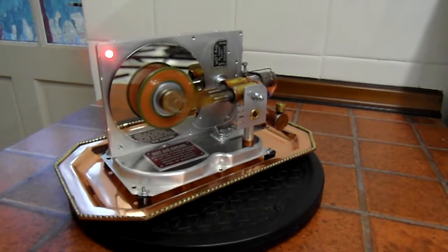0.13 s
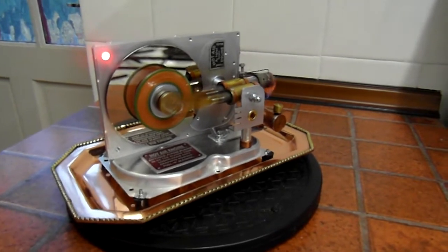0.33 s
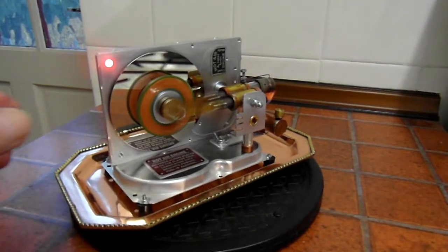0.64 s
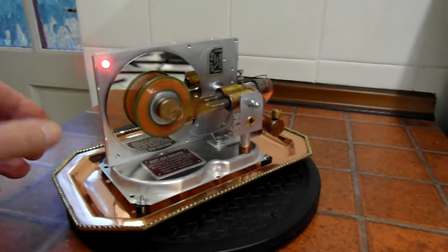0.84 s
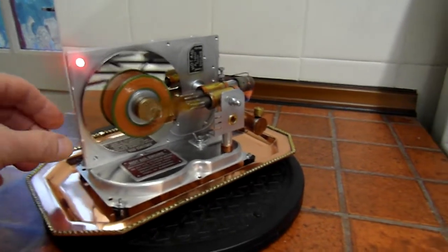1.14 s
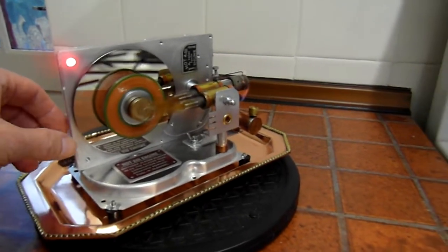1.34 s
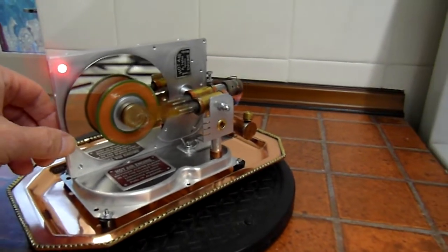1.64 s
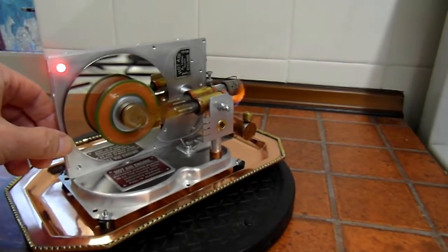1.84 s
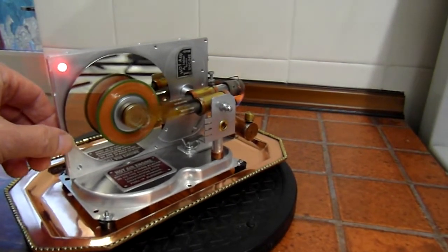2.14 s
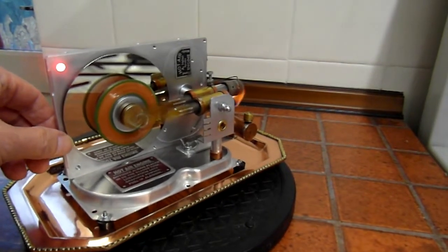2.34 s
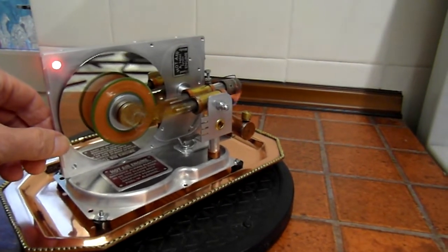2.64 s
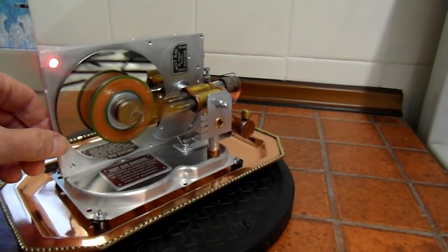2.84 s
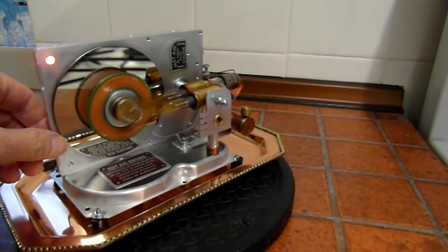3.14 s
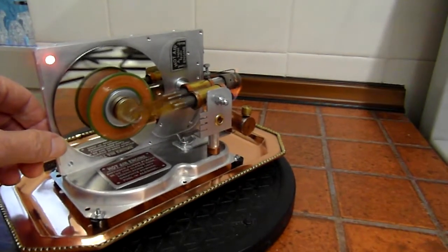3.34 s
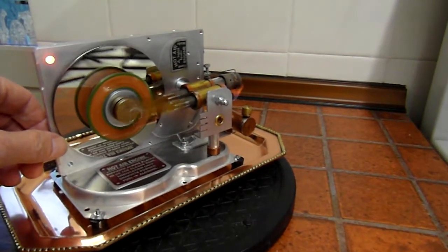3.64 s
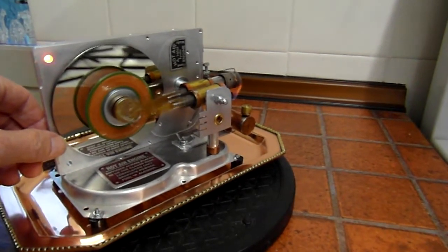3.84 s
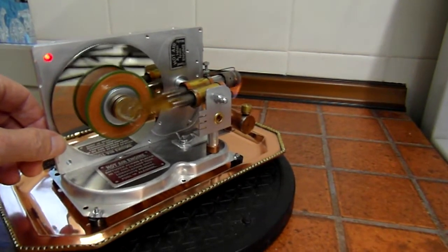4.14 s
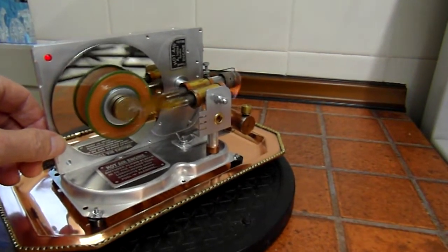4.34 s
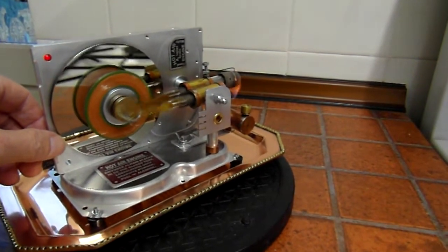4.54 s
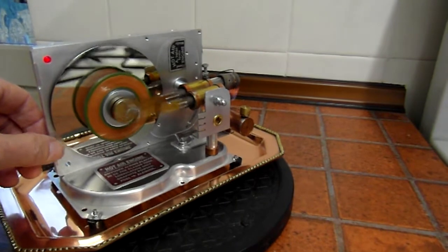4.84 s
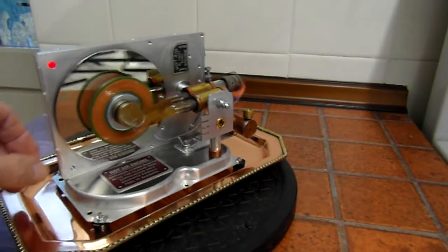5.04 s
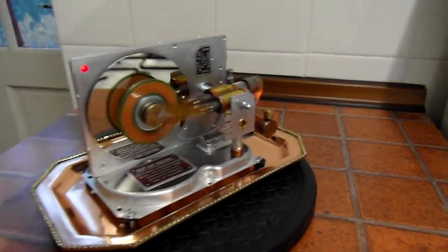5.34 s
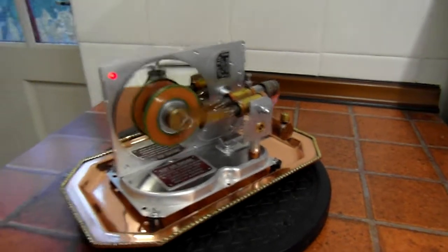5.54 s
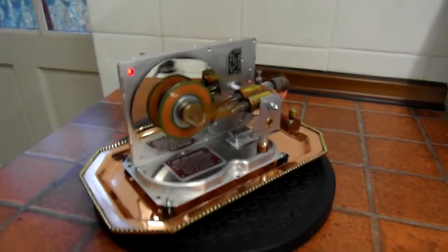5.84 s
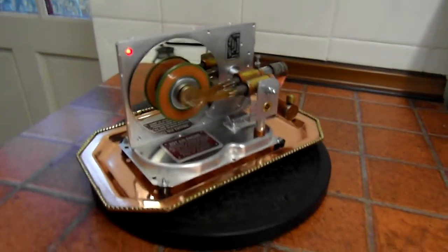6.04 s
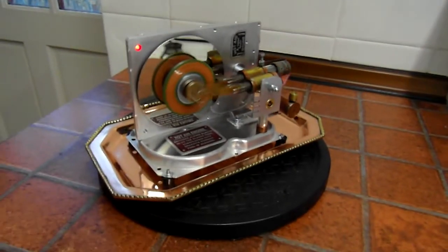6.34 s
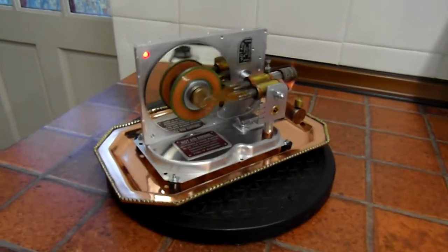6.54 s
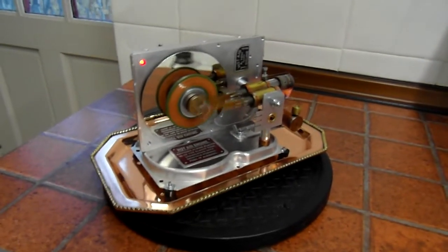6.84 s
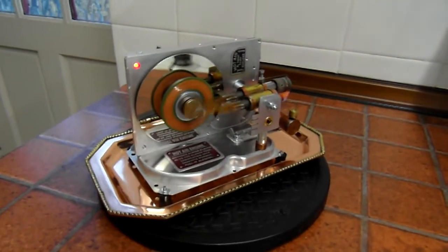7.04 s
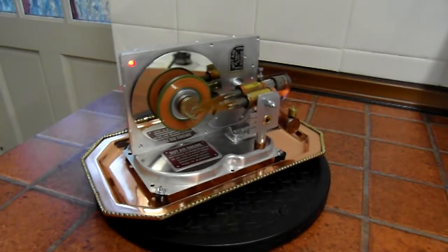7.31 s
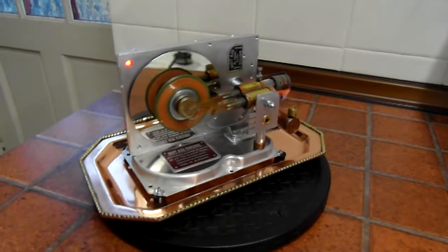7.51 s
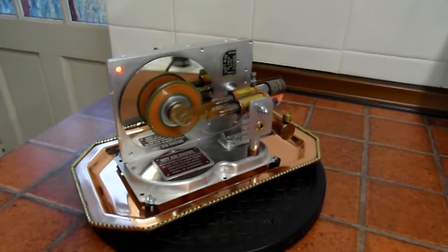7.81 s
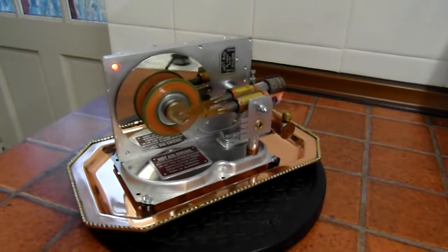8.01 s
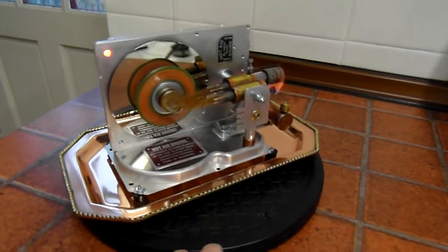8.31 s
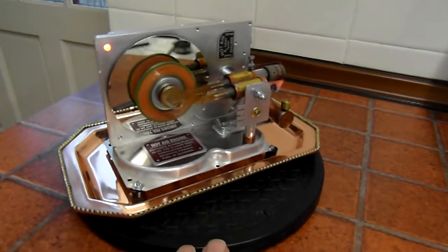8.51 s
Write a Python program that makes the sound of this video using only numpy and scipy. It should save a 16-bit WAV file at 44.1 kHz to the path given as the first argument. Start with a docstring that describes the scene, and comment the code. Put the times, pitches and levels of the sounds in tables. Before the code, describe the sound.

Fast, bright ticking and grainy whirring from a model engine on a metal tray drags down to a slower, throbbing chug, then gradually recovers.

```python
"""Small hot-air engine on a metal tray

A model hot-air engine runs in a tiled room; a finger loads it, it slows, then partly picks up again.
Each turn, clicks and noise make the rod's knocks, resonances make the small parts and the piston ring,
rough noise makes the bearings rub, and a once-a-turn push makes the hollow under the tray throb.
Shaft tones, bumps, room echoes, a low hum and still air complete the scene."""
import sys
import numpy as np
from scipy import signal
from scipy.fft import rfft, irfft, next_fast_len
from scipy.io import wavfile
from scipy.ndimage import uniform_filter1d, map_coordinates

SR = 44100
rng = np.random.default_rng(int(sys.argv[2]) if len(sys.argv) > 2 else 0)


def int16_out(signal):
    """Quantize to a 16-bit WAV file."""
    q = np.round(np.clip(np.atleast_2d(signal).T, -1, 1) * 32767)
    wavfile.write(sys.argv[1], SR, q.astype(np.int16))


N = 382347
TIME = np.arange(N) / SR
SLOW_RATE, FAST_RATE = 18.0, 26.7   # turns per s that count as slow (pace 0) and fast (pace 1)
CUTOFF_HZ = 11560   # the finished sound is cut steeply above this


# Speed of the flywheel. Each row: time in seconds, speed in turns per second.
FLYWHEEL_SPEED = [(0.0, 26.792), (0.3, 26.757), (0.7, 26.739), (1.4, 26.622), (2.1, 26.578), (2.3, 25.267),
                  (2.55, 25.057), (2.85, 23.012), (3.1, 22.604), (3.5, 22.598), (3.8, 21.159),
                  (4.1, 19.408), (4.3, 17.822), (4.5, 17.608), (5.0, 18.286), (5.6, 18.93), (6.4, 19.487),
                  (7.0, 19.783), (7.5, 19.965), (8.1, 20.242), (8.67, 20.403)]
START_ANGLE = -.0148   # turns


def flywheel():
    """Adding up the speed gives the crank angle that times every part; the turning is never quite even."""
    rate, = in_time(FLYWHEEL_SPEED)
    turn = START_ANGLE + np.cumsum(rate) / SR + .001 * drift(25)
    pace = (rate - SLOW_RATE) / (FAST_RATE - SLOW_RATE)
    return rate, turn, pace


# Joints with play. Each row: angle when slow in turns, angle when fast in turns, relative level when slow
# in dB, the same when fast in dB, chatter length in seconds, chatter level in dB, top of the treble in Hz.
JOINT_KNOCKS = [(.204, .186, 4, 7, 0.0037, -1.5, 10400), (.248, .232, 1, 3.5, 0.0054, 2.5, 4640),
                (.672, .69, -2, -3, 0.0085, 6.5, 5700), (.60, .425, -10.5, -5, 0.0046, 5, 13300),
                (1.10, .94, -15, -5.5, 0.0028, 6.5, 15000)]
# Tone colour of the knocks. Each row: frequency in Hz, gain in dB.
KNOCK_COLOUR = [(40, -60), (250, -35.5), (500, -12), (950, -10), (1400, -5), (2400, -2), (3500, 1),
                (4700, -4), (5400, -4), (6400, -6), (7400, 2.5), (8500, -8), (9800, -1), (11500, -3)]


def linkage(turn, pace):
    """Every joint takes up its play with a click, rebounds and a short chatter."""
    force, grit = 0, surface(turn, fresh_db=8.0)
    for slow, fast, slow_db, fast_db, length_s, chatter_db, top_hz in JOINT_KNOCKS:
        angle = slow + pace * (fast - slow)
        clicks = once_a_turn(turn - angle, uneven_db=0.57, jitter_s=.00008)
        clicks = clicks * by_speed(pace, slow_db, fast_db - slow_db)
        rattle = from_db(chatter_db) * grit * chatter(clicks, length_s)
        force = force + softened(rebounding(clicks) + rattle, top_hz)
    return frame(dispersed(force, spread_s=0.0013005), KNOCK_COLOUR, modes_db=-0.5)


BOUNCE_S, BOUNCE_DB, BOUNCE_TOP_HZ = 0.001201, -8.5, 6000   # gap, level against the hit before, treble limit


def rebounding(clicks):
    """A click and its two rebounds, each weaker and duller than the hit before."""
    out, lag = clicks, int(BOUNCE_S * SR)
    duller = signal.butter(1, BOUNCE_TOP_HZ, fs=SR)
    for bounce in range(2):
        late = np.r_[np.zeros(lag), clicks][:N]
        clicks = from_db(BOUNCE_DB) * signal.lfilter(*duller, late + 1e-18)
        out = out + clicks
    return out


def softened(x, top_hz):
    """A softer contact has less treble."""
    return signal.lfilter(*signal.butter(2, top_hz, fs=SR), x + 1e-18)


def dispersed(force, spread_s):
    """Bending waves in a plate: the highs arrive first, with a delay that grows towards the bass."""
    size = next_fast_len(N + 4096, real=True)
    hz = np.arange(size // 2 + 1) * SR / size
    # this phase means a delay of spread_s at 2 kHz; the delay at the cutoff is then taken off everywhere
    phase = 4 * np.pi * spread_s * np.sqrt(2000 * hz)
    head_start = 2 * np.pi * hz * spread_s * np.sqrt(2000 / CUTOFF_HZ)
    return irfft(rfft(force, size) * np.exp(-1j * (phase - head_start)), size)[:N]


# Ringing of the frame. Each row: pitch in Hz, width in Hz, relative level in dB.
FRAME_MODES = [(1344, 30, -11.5), (2630, 120, -47), (3140, 34, -0.5), (3470, 98, -3), (3880, 42, -4.5),
               (4099, 54, 11), (4700, 130, -5.5), (9030, 240, 1)]


def frame(force, colour, modes_db):
    """A force heard through the aluminium frame, whose modes ring along."""
    x = coloured(force, colour)
    return evened(x + from_db(modes_db) * resonate(x, FRAME_MODES))


# Parts that ping once a turn. Each row: angle when slow in turns, angle when fast in turns, middle pitch in Hz,
# width in Hz, relative level when slow in dB, the same when fast in dB.
PART_PINGS = [(.21, 0.18, 3380, 59, -9.5, -16), (.21, .19, 4120, 38, -5, -6),
              (.68, .68, 4130, 32, -7.5, -8), (.21, .2, 3490, 93, -20, -6.5),
              (0.74, .68, 3920, 74, -11, -10), (.68, .68, 3340, 63, -14, -13.5),
              (.21, .19, 4660, 120, -6, -16), (0.56, .645, 2500, 160, -26, -5),
              (0.19, .19, 2520, 200, -28, -10), (.66, .645, 1430, 71, -30, -10),
              (.69, 0.73, 3160, 45, -9, -13), (0.60, 0.425, 7380, 310, -20.5, -11),
              (1.10, .94, 7000, 1000, -21, -15)]
PING_WANDER, PING_UNEVEN_DB = .0035, 1.6   # typical drift of pitch (share of it), unevenness of strength


def pings(turn, pace):
    """Small metal parts ring as the load on them reverses, at a wandering pitch; many fade at low speed."""
    out = 0
    for slow, fast, hz, width, slow_db, fast_db in PART_PINGS:
        angle = slow + pace * (fast - slow)
        clicks = once_a_turn(turn - angle, uneven_db=PING_UNEVEN_DB, jitter_s=.0003)
        pitch = hz * (1 + PING_WANDER * drift(30))
        tone = np.sin(2 * np.pi * np.cumsum(pitch) / SR)
        ringing = evened(chatter(clicks, 1 / (np.pi * width)) * tone)   # a wider mode dies sooner
        out = out + by_speed(pace, slow_db, fast_db - slow_db) * ringing
    return out


# Piston scrapes. Each row: angle when slow in turns, angle when fast in turns, width in turns,
# relative level when slow in dB, the same when fast in dB.
PISTON_SCRAPES = [(.655, 0.48, 0.062, 6, 4), (1.11, 0.94, 0.038, 1, 0)]
# Ringing of piston and cylinder. Each row: pitch in Hz, width in Hz, relative level in dB.
CYLINDER_MODES = [(11075, 90, -7), (11295, 110, 0), (11450, 70, -4)]
# Strength of the thin ring over time. Each row: time in seconds, level in dB before the trim below.
RING_LEVEL = [(0, -28), (1.5, -28.5), (2.2, -30), (2.7, -28), (3.3, -28.5), (3.7, -29.5), (4.0, -32),
              (4.42, -27.5), (4.75, -27), (5.15, -29), (5.7, -33.5), (6.5, -33), (7.65, -33), (8.0, -29.5),
              (8.67, -29)]
RING_TRIM_DB = 3.0


def piston(turn, pace):
    """Twice a turn the piston scrapes and the cylinder rings; so short a wave reaches each ear differently."""
    sliding = from_db(-11 + 5 * pace)
    pressure = swells(turn, pace, PISTON_SCRAPES, uneven_db=0.0) + sliding
    pressure = pressure * from_db(2.06 * drift(40))
    mid, side = (evened(resonate(pressure * surface(turn, fresh_db=1.0), CYLINDER_MODES)) for part in range(2))
    ears = mid + from_db(-13.0) * side * np.array([[1], [-1]])
    return from_db(in_time(RING_LEVEL)[0] + RING_TRIM_DB) * ears


# Load peaks on the bearings. Each row: angle when slow in turns, angle when fast in turns, width in turns,
# relative level when slow in dB, the same when fast in dB; the steady rub stands at about 4 dB.
BEARING_LOADS = [(0.17, 0.24, .04, 6, -5.5), (0.66, 0.68, 0.065, 1, -3), (0.332, 0.4, 0.016, 2, -1),
                 (0.42, 0.474, 0.026, -13, -5), (0.064, 0.021, .03, -16, -5)]
# Tone colour of the rub. Each row: frequency in Hz, gain in dB.
RUB_COLOUR = [(40, -63), (280, -33.5), (420, -5.5), (680, -10), (930, -10.5), (1300, 3), (1900, -1),
              (2600, -1), (4100, -6.5), (5200, -5.5), (6400, -10), (7400, -8.5), (8500, -10.5),
              (11500, -15)]
# Thin modes of the upright plate. Each row: pitch in Hz, width in Hz, relative level in dB before it wanders.
PLATE_MODES = [(1193, 16, 1.5), (1354, 25, -1), (1677, 31, -5), (1815, 48, -2.5), (2032, 40, 0.5),
               (2106, 18, -3)]


def bearings(turn, pace, grain_db, plate_db, wander_db):
    """Grainy rubbing swells with the load and rings the upright plate, each mode wandering by itself."""
    pressure = 1.6 + swells(turn, pace, BEARING_LOADS, uneven_db=2.0)
    pressure = pressure * from_db(grain_db * drift(900))
    force = pressure * surface(turn, fresh_db=2.0)
    plate = sum(from_db(wander_db * drift(4)) * resonate(force, [mode]) for mode in PLATE_MODES)
    return frame(force, RUB_COLOUR, modes_db=-4.5) + from_db(plate_db) * rms_one(plate)


SWELL_ATTACK, SWELL_RELEASE = 0.78, 1.2   # each flank as a share of the width


def swells(turn, pace, rows, uneven_db):
    """Humps of pressure, quicker to build than to fade; angle and strength shift with speed."""
    out = 0
    for slow, fast, width, slow_db, fast_db in rows:
        away = (turn - slow - pace * (fast - slow) + .5) % 1 - .5   # turns from the top of the hump
        flank = width * np.where(away < 0, SWELL_ATTACK, SWELL_RELEASE)
        strength = from_db(slow_db + pace * (fast_db - slow_db) + uneven_db * drift(20))
        out = out + strength * np.exp(-.5 * (away / flank) ** 2)
    return out


# Tone colour of the rumble. Each row: frequency in Hz, gain in dB.
RUMBLE_COLOUR = [(20, -22), (50, -21), (100, -15.5), (135, -4.5), (170, -10), (205, -7), (255, -11.5),
                 (320, -16), (500, -27), (2000, -40)]
# Buzz of the base plate. Each row: pitch in Hz, width in Hz, gain in dB (evened out afterwards).
BUZZ_MODE = [(261, 90, 0)]
# Resonance of the finger's chafing. Each row: pitch in Hz, width in Hz, gain in dB (evened out afterwards).
CHAFE_MODE = [(650, 200, 0)]
# the finger presses: start, end and fade in seconds, extra throb, level of its chafing
PRESS_START_S, PRESS_END_S, PRESS_FADE_S, PRESS_DB, CHAFE_DB = 2.8, 4.23, 0.3, 2, -40.5
# the support shakes more while the load drags the engine down: start, end and fade in seconds, extra level
DRAG_START_S, DRAG_END_S, DRAG_FADE_S, DRAG_DB = 2.23, 3.9, 0.058, 1.5


def tray(turn, rate, pace):
    """The shaken support throbs, sings, buzzes and rumbles; a finger presses and chafes for a while."""
    rumble = rms_one(coloured(surface(turn, fresh_db=-8), RUMBLE_COLOUR))
    buzz = rms_one(resonate(resonate(rumble, BUZZ_MODE), BUZZ_MODE))
    buzz = by_speed(pace, slow_db=-74, rise_db=18) * buzz
    press = held(PRESS_START_S, PRESS_END_S, PRESS_FADE_S)
    chafe = rms_one(resonate(resonate(rng.standard_normal(N), CHAFE_MODE), CHAFE_MODE))
    chafe = from_db(CHAFE_DB) * press * chafe
    rocking = from_db(PRESS_DB * press) * throb(turn, rate, overtones_db=-7)
    shaking = rocking + drone(turn, pace, rough_db=-7.5)
    shaking = shaking + by_speed(pace, slow_db=-58.5, rise_db=6) * rumble
    drag = from_db(DRAG_DB * held(DRAG_START_S, DRAG_END_S, DRAG_FADE_S))
    return chafe + buzz + singing(turn, pace) + drag * shaking


# The hollow under the tray, one resonance feeding the next.
# Each row: pitch in Hz, width in Hz, gain in dB (evened out afterwards).
HOLLOW_MODES = [(561, 77, -3), (606, 81, 2)]
# Higher tray modes struck by the rocking. Each row: pitch in Hz, width in Hz, relative level in dB.
OVERTONE_MODES = [(710, 56, 3), (816, 55, 1.5), (1051, 29, 6.5)]
ROCK_RATE, ROCK_WIDTH = 19.66, 0.507   # speed of hardest rocking and half width, turns per s
THROB_DB, ROCK_BOOST_DB = -43, 9   # level far from that speed and boost at it, before press and drag
ROCK_ANGLE, ROCK_SLIP = 0.1992, 0.272   # crank angle there and total slip across the resonance, turns


def throb(turn, rate, overtones_db):
    """The frame rocks once a turn, harder near its resonant speed and later above it; the hollow answers."""
    detune = (rate - ROCK_RATE) / ROCK_WIDTH
    angle = ROCK_ANGLE + ROCK_SLIP * np.arctan(detune) / np.pi
    push = once_a_turn(turn - angle, uneven_db=.7, jitter_s=.00004)
    pulse = push
    for mode in HOLLOW_MODES:
        pulse = resonate(pulse, [mode])
    sound = evened(pulse) + from_db(overtones_db) * evened(resonate(push, OVERTONE_MODES))
    return from_db(THROB_DB + ROCK_BOOST_DB / (1 + detune ** 2)) * sound


# Broad modes of the tray. Each row: pitch in Hz, width in Hz, level when slow in dB, level when fast in dB,
# both before the extra shaking under drag.
BROAD_MODES = [(398, 120, -52, -47), (556, 160, -49, -49), (675, 110, -43.5, -48)]


def drone(turn, pace, rough_db):
    """The shaking of the frame keeps the tray's broad modes humming."""
    radiated = signal.butter(5, [345, 950], "band", fs=SR, output="sos")
    force = signal.sosfilt(radiated, surface(turn, fresh_db=rough_db))
    out = 0
    for hz, width, slow_db, fast_db in BROAD_MODES:
        mode = rms_one(resonate(force, [(hz, width, 0)]))
        out = out + by_speed(pace, slow_db, fast_db - slow_db) * mode
    return out


# Narrow modes of the tray. Each row: pitch in Hz, width in Hz, level when slow in dB, level when fast in dB,
# both before the extra level under load.
NARROW_MODES = [(427, 9.2, -51.5, -56), (630, 15.2, -45, -43), (832, 28, -54.5, -62)]
# louder under load: start, end and fade in seconds, extra level
SING_START_S, SING_END_S, SING_FADE_S, SING_DB = 2.16, 6.0, .2, 6


def singing(turn, pace):
    """Narrow tray modes swell when a multiple of the shaft's speed passes through, and more under load."""
    push = once_a_turn(turn, uneven_db=2.5, jitter_s=0.00018)
    out = 0
    for hz, width, slow_db, fast_db in NARROW_MODES:
        mode = [(hz, width, 0)]
        tone = rms_one(resonate(resonate(push, mode), mode))
        out = out + by_speed(pace, slow_db, fast_db - slow_db) * tone
    return from_db(SING_DB * held(SING_START_S, SING_END_S, SING_FADE_S)) * out


# Tones locked to the shaft. Each row: approximate pitch at FAST_RATE in Hz (rounded to a whole multiple
# of the shaft's speed), relative level in dB.
SHAFT_TONES = [(242.2, -57), (347, -56), (371.4, -53), (398.4, -50), (560, -51), (641, -49), (721.4, -45),
               (748, -53), (990, -52), (1093, -48)]
WHINE_DB, WHINE_FALL_DB = -1, 70   # trim at FAST_RATE, fall down to SLOW_RATE


def whine(turn, pace, waver_db):
    """Wavering tones on whole multiples of the shaft's speed; they fade as it slows."""
    out = 0
    for hz, db in SHAFT_TONES:
        phase = np.round(hz / FAST_RATE) * turn + rng.random()
        out = out + from_db(db + waver_db * drift(7.3)) * np.sqrt(2) * np.sin(2 * np.pi * phase)
    return from_db(WHINE_DB - WHINE_FALL_DB * (1 - pace)) * out


# Faint bumps. Each row: time in seconds, peak level in dB before the room adds its echoes.
DULL_BUMPS = [(0.829, -41), (1.11, -44), (1.58, -38), (2.175, -37), (2.78, -43), (2.915, -43), (2.96, -32),
              (3.135, -31), (3.225, -38), (3.445, -35)]


def bumps():
    """A few faint, dull bumps: single clicks limited to the bass."""
    clicks = np.zeros(N)
    for s, db in DULL_BUMPS:
        clicks[int(s * SR)] += from_db(db)
    bass = signal.butter(2, [35, 320], "band", fs=SR, output="sos")
    thud = signal.sosfilt(bass, TIME[:SR // 10] == 0)
    return signal.fftconvolve(clicks, thud / thud.max())[:N]


# How unlike the echoes are at the two ears. Each row: frequency in Hz, level of the difference in dB.
EAR_SPREAD = [(100, -3), (550, -15), (1300, -10), (2700, -3), (5500, -3), (11500, 3.5)]


def room(x, near_db, near_t60, far_db, far_t60):
    """Quick reflections off tray and tiles, then the room's tail, as dying noise added to the direct sound."""
    t = TIME[:SR // 2]
    near, far = (from_db(-60 * t / t60) * (t > .001) for t60 in (near_t60, far_t60))
    near = from_db(near_db) * near / np.linalg.norm(near)
    far = from_db(far_db) * far / np.linalg.norm(far)
    mid, side = rng.standard_normal((2, len(t))) * np.hypot(near, far)
    # small surfaces return little bass
    mid = signal.sosfilt(signal.butter(1, 900, "high", fs=SR, output="sos"), mid)
    side = coloured(side, EAR_SPREAD)
    responses = [uncoloured((t == 0) + echoes) for echoes in (mid + side, mid - side)]
    return np.array([signal.fftconvolve(x, response)[:N] for response in responses])


def uncoloured(response):
    """Diffuse reflections smear a sound in time and roughly keep its spectrum."""
    power = uniform_filter1d(np.abs(rfft(response)) ** 2, size=25)
    hz = np.linspace(1, SR / 2, len(power))
    return coloured(response, np.c_[hz, -10 * np.log10(power)])


def off_centre(ears, lag_s):
    """The right ear is slightly nearer, so the left one hears a moment later."""
    return np.array([map_coordinates(ears[0], [np.arange(N) - lag_s * SR], order=3), ears[1]])


# Steady tone in the room. Each row: pitch in Hz, level in dB before the swell below.
HUM_TONES = [(126, -58.5)]
# The low hum swells and sinks. Each row: time in seconds, change of level in dB.
HUM_SWELL = [(0, -1), (2.1, 0.5), (2.9, 4), (3.65, 0), (3.85, -7), (4.15, 0), (4.35, -11), (4.9, 1),
             (5.4, -14), (5.7, 0), (7.5, -0.5), (8.67, -6)]


def low_hum(turn, rate):
    """A steady tone and the stand's low tones swell and sink together."""
    steady = sum(from_db(db) * np.sqrt(2) * np.sin(2 * np.pi * hz * TIME) for hz, db in HUM_TONES)
    return from_db(in_time(HUM_SWELL)[0]) * (steady + unbalance(turn, rate, waver_db=2.0))


STAND_HZ, STAND_WIDTH_HZ, STAND_DB = 138, 15, -58.5   # centre, half width, peak level before waver and swell


def unbalance(turn, rate, waver_db):
    """The unbalanced flywheel shakes the stand: low multiples of its speed glide through a resonance."""
    out = 0
    for multiple in range(5, 10):
        detune = (multiple * rate - STAND_HZ) / STAND_WIDTH_HZ
        gain = from_db(STAND_DB + waver_db * drift(2.52)) / (1 + detune ** 2)
        out = out + gain * np.sqrt(2) * np.sin(2 * np.pi * (multiple * turn + rng.random()))
    return out


# Tone colour of the still air. Each row: frequency in Hz, gain in dB.
AIR_COLOUR = [(20, 0), (60, -11), (150, -1.5), (400, -4), (2000, -33), (12000, -35)]


def still_air():
    """Soft, mostly low noise, separate at each ear."""
    ears = [rms_one(coloured(rng.standard_normal(N), AIR_COLOUR)) for ear in range(2)]
    return from_db(-56.5) * np.array(ears)


def surface(turn, fresh_db):
    """Sliding noise: the same roughness comes round every turn, mixed with fresh grit."""
    profile = irfft(np.exp(2j * np.pi * rng.random(1201)))   # equally rough at all scales
    repeating = map_coordinates(profile, [turn % 1 * len(profile)], order=1, mode="grid-wrap")
    return rms_one(rms_one(repeating) + from_db(fresh_db) * rng.standard_normal(N))


def once_a_turn(turn, uneven_db, jitter_s):
    """A click whenever the angle passes a whole turn, each a little different in time and strength."""
    at = np.flatnonzero(np.diff(np.floor(np.maximum.accumulate(turn))))
    chance = rng.standard_normal((300, 2))[:len(at)]
    shift = (chance[:, 0] * jitter_s * SR).astype(int)
    clicks = np.zeros(N)
    clicks[np.clip(at + shift, 0, N - 1)] = from_db(uneven_db * chance[:, 1])
    return clicks


def chatter(clicks, length_s):
    """Dying envelope after each click, with the click's energy."""
    r = np.exp(-1 / (length_s * SR))
    return signal.lfilter([np.sqrt(1 - r * r)], [1, -r], clicks + 1e-18)


def resonate(x, modes):
    """Resonances side by side, each with its gain at the peak; a narrow one rings longer."""
    out = 0
    for hz, width, db in modes:
        r = np.exp(-np.pi * width / SR)
        top = from_db(db) * (1 - r * r) / 2
        feedback = [1, -2 * r * np.cos(2 * np.pi * hz / SR), r * r]
        out = out + signal.lfilter([top, 0, -top], feedback, x + 1e-18)
    return out


def coloured(x, colour):
    """Filter with the given spectrum that answers as early as it can (minimum phase)."""
    size = 16384
    hz, db = np.transpose(colour)
    grid = np.maximum(np.arange(size // 2 + 1) * SR / size, 1)
    gain = from_db(np.interp(np.log(grid), np.log(hz), db))
    cepstrum = irfft(np.log(gain))
    # folding the second half onto the first leaves no response before time zero
    cepstrum[1:size // 2] *= 2
    cepstrum[size // 2 + 1:] = 0
    return signal.oaconvolve(x, irfft(np.exp(rfft(cepstrum))))[:len(x)]


def by_speed(pace, slow_db, rise_db):
    """Gain whose dB climb evenly from slow (pace 0) to fast (pace 1)."""
    return from_db(slow_db + rise_db * pace)


def held(start_s, end_s, fade_s):
    """Rises from 0, holds at 1 and falls back to 0."""
    return np.clip(np.minimum(TIME - start_s, end_s - TIME) / fade_s, 0, 1)


def drift(rate):
    """Random wander of rms 1 with rate new points per second; after 4000 points it stays at the last."""
    return rms_one(np.interp(TIME * rate, np.arange(4000), rng.standard_normal(4000)))


def in_time(rows):
    """Each column of a curve at every sample."""
    s, *columns = np.transpose(rows)
    return [np.interp(TIME, s, c) for c in columns]


def evened(x):
    """Level held near rms 1 over several turns."""
    power = uniform_filter1d(uniform_filter1d(x ** 2, size=9000), size=7000)
    return x / np.sqrt(power + 1e-20)


def rms_one(x):
    """Scale to an overall rms of 1."""
    return x / np.sqrt(np.mean(x ** 2) + 1e-20)


def from_db(db):
    """Turn dB into a plain factor."""
    return 10 ** (np.asarray(db) / 20)


# below this speed in turns per s the engine labours: dB the rub loses and the knocks gain per turn per s
LABOUR_RATE, LABOUR_RUB_DB, LABOUR_KNOCK_DB = 19.8, 1.1, 0.72


def scene():
    """The flywheel's speed times and drives every part; the room, a hum and still air surround it."""
    rate, turn, pace = flywheel()
    labour = np.maximum(LABOUR_RATE - rate, 0)
    knocks = by_speed(pace, slow_db=-26.5, rise_db=4.0) * linkage(turn, pace)
    knocks += by_speed(pace, slow_db=-30.5, rise_db=3) * pings(turn, pace)
    knocks = from_db(LABOUR_KNOCK_DB * labour) * knocks
    rub = bearings(turn, pace, grain_db=1.0, plate_db=-12, wander_db=5.0)
    rub = from_db(-LABOUR_RUB_DB * labour) * by_speed(pace, slow_db=-29.5, rise_db=4) * rub
    engine = knocks + rub + tray(turn, rate, pace)
    heard = room(engine + bumps(), near_db=-3.5, near_t60=0.024, far_db=-8.0, far_t60=0.32)
    # the piston's ring and the whine skip the room
    heard = heard + piston(turn, pace) + whine(turn, pace, waver_db=2.0)
    return off_centre(heard, lag_s=.00002) + low_hum(turn, rate) + still_air()


def record(dry):
    """The left microphone is a little thinner than the right; the top is cut steeply."""
    # each pair: frequency in Hz, gain in dB
    left = coloured(dry[0], [(150, -1.3), (2000, -0.66), (6000, 0.23), (11000, 0.82)])
    right = coloured(dry[1], [(150, 0.47), (2000, 0.64), (6000, 0.065), (11000, 1.0)])
    return signal.sosfilt(signal.ellip(14, .1, 80, CUTOFF_HZ, fs=SR, output="sos"), [left, right])


dry = scene()
out = record(dry)
int16_out(out)
```